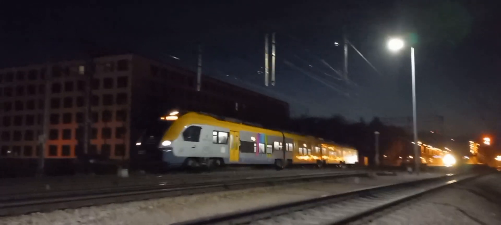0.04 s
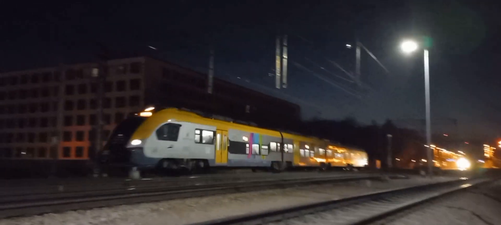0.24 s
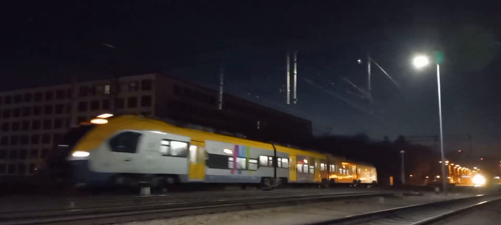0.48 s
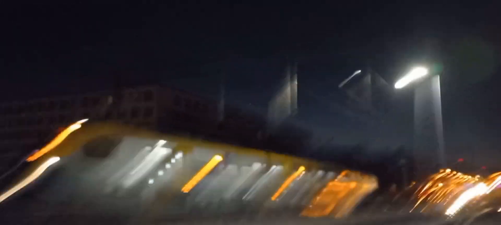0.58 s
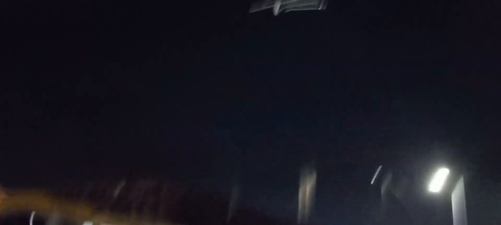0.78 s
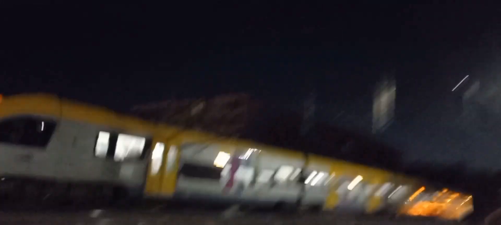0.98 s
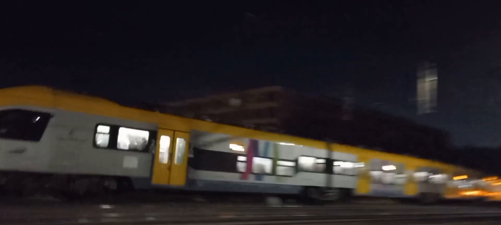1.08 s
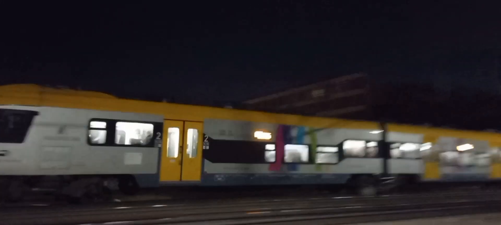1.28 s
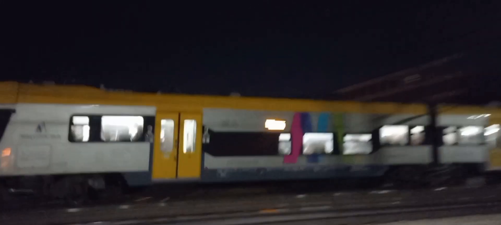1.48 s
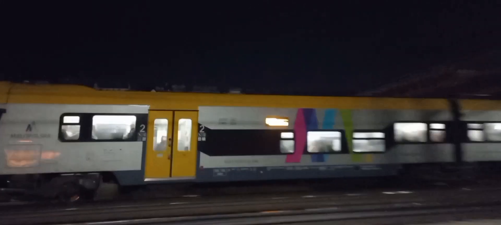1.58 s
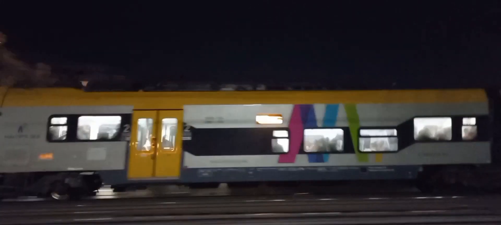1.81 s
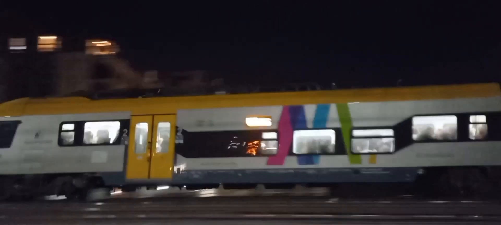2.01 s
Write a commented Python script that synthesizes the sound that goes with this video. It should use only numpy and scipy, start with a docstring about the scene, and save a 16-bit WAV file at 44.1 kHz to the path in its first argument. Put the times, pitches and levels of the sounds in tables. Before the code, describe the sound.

A train horn sounds one loud two-note blast after a rising air hiss, over low rumble and wheel roar; it cuts off, leaving echoes and quieter rolling. Outdoors by the tracks, stereo, close microphone slightly overloaded.

```python
"""Railway station: an electric train runs past and gives one blast on its two air horns.
Shaped noise makes the rumble, wheel roar, drive whine and the air hiss that rises before the blast.
Each horn is a harmonic stack: the low one stutters into voice and the high one joins;
the low one sputters out and the high one fades smoothly just after it.
Buildings ahead and behind return the chord sharp and flat, as noise tails on Doppler-shifted copies."""
import sys
import numpy as np
from scipy import signal
from scipy.io import wavfile
from scipy.ndimage import uniform_filter1d, minimum_filter1d, map_coordinates

SR = 44100
rng = np.random.default_rng(int(sys.argv[2]) if len(sys.argv) > 2 else 0)


def store_wav(level_fs):
    """Save 16-bit WAV to argv[1]."""
    pcm = np.round(np.clip(np.atleast_2d(level_fs), -1, 1) * 32767)
    wavfile.write(sys.argv[1], SR, pcm.T.astype(np.int16))


N = 90404

# Noise spectra are relative: each noise is scaled to unit rms before its level applies.
# low rumble level: time_s, level_db
RUMBLE_LEVEL = [(0, -28), (.19, -33), (.235, -20.5), (.275, -25.5), (.32, -33.5), (.39, -24.5),
                (.47, -25.5), (.53, -48), (.65, -49), (1.0, -51), (1.2, -48.5), (1.28, -42.5),
                (2.05, -41.5)]
# low rumble spectrum: freq_hz, density_db
RUMBLE_SPECTRUM = [(20, -57), (45, -41), (75, -12.5), (120, -22.5), (160, -11.5), (200, 3), (255, 0),
                   (320, -26), (500, -30), (1500, -57)]
# wheel roar level: time_s, level_db
ROAR_LEVEL = [(0, -34.5), (.2, -34.5), (.44, -33.5), (.56, -34.5), (.75, -44), (1.0, -41.5), (1.25, -42.5),
              (1.7, -43), (2.05, -42)]
# wheel roar spectrum: freq_hz, density_db
ROAR_SPECTRUM = [(30, -9), (200, -5), (430, 0.5), (600, -0.5), (930, -2), (1300, -7), (1650, -9),
                 (2100, -12), (3200, -12), (6200, -15.5), (7600, -36.5), (12000, -32), (16000, -35)]
# drive whine bands: centre_hz, width_hz, start_level_db
WHINE_BANDS = [(1940, 140, -46), (2345, 150, -44.5)]
# air hiss level: time_s, level_db
HISS_LEVEL = [(0, -52), (.19, -43), (.225, -31), (.42, -27.5), (.5, -28), (.58, -27), (.98, -31.5),
              (1.09, -36), (1.16, -35), (2.05, -82)]
# air hiss spectrum: freq_hz, density_db
HISS_SPECTRUM = [(200, -11), (950, -27), (1800, -3), (2500, -0.5), (2950, -6), (3400, -0.5), (4000, -3.5),
                 (5300, -1.5), (6600, -6.5), (7800, -23.5), (16000, -23)]
# top sizzle level: time_s, level_db
SIZZLE_LEVEL = [(0, -57), (.024, -75), (.034, -41), (.055, -52), (.11, -45), (.194, -51), (.202, -32),
                (.42, -31.5), (.51, -33), (.62, -32), (.96, -31.5), (1.09, -43.5), (1.2, -61), (1.5, -68),
                (1.53, -61), (1.6, -66), (1.8, -69), (1.925, -83), (1.938, -47), (2.05, -62.5)]
# top sizzle spectrum: freq_hz, density_db
SIZZLE_SPECTRUM = [(500, -35), (4000, -18), (6000, 2.5), (8200, -5.5), (10500, -2), (12500, 0),
                   (16000, -4.5)]
# left-right correlation of the noises: freq_hz, correlation (0-1)
NOISE_CORRELATION = [(40, .6), (90, 0.87), (170, 0.98), (260, 1), (600, 0.6), (2000, 0.53), (6000, 0.04),
                     (16000, .2)]
# low horn blow: time_s, pitch_hz, level_db, dullness_db_per_khz
LOW_BLOW = [(.45, 355.2, -30, 6), (.457, 363.4, -1.5, 4), (0.468, 373.4, 6, 1), (0.479, 373.3, 2.5, 6),
            (0.49, 364, -4.5, 14.5), (0.496, 364.7, 13.5, 3.5), (0.509, 388.8, 5, 1),
            (.54, 389.5, 0.5, 0.86), (0.719, 385.4, -0.5, 0.5), (0.991, 384.6, 2.5, 1),
            (1.035, 379, -5, -0.5), (1.052, 384, 8, 4.5), (1.069, 381.4, -14, -1.5), (1.088, 379.2, 5.5, 2),
            (1.125, 375.4, -20, -1.5)]
# high horn blow: time_s, pitch_hz, level_db, dullness_db_per_khz
HIGH_BLOW = [(.515, 686.4, -46, 6), (.535, 686.3, 2, 3), (.56, 698, 1.5, -0.27), (.63, 685.5, 0.5, -0.5),
             (.74, 680.5, -0.5, 0), (.94, 673.7, 1, 0.5), (1.02, 682, 1, 1.9), (1.055, 696.7, -3.5, 0.5),
             (1.1, 699.2, -2, 5.5), (1.145, 689, -7.5, 5), (1.175, 690, -25, -1)]
# low horn partials: multiple, left_db, right_db
LOW_PARTIALS = [(1, -21.5, -24.5), (2, -22, -22.5), (3, -22.5, -29), (4, -23, -28), (5, -30, -31.5),
                (6, -29.5, -29.5), (7, -34.5, -32.5), (8, -34.5, -34.5), (9, -34, -37), (10, -34, -46.5),
                (11, -36, -38), (12, -53, -32), (13, -51, -30), (14, -50, -32.5), (15, -42, -31),
                (16, -52, -46), (17, -52, -40), (18, -40.5, -45)]
# high horn partials: multiple, left_db, right_db
HIGH_PARTIALS = [(1, -16, -13.5), (2, -18.5, -21.5), (3, -23, -29.5), (4, -27.5, -28.5), (5, -38, -34.5),
                 (6, -30, -27.5), (7, -29.5, -39.5), (8, -33, -30), (9, -34, -36), (10, -39, -46),
                 (11, -46, -48), (12, -54, -61), (13, -57, -50), (14, -43, -48), (15, -45, -57),
                 (16, -42, -49), (17, -42.5, -47), (18, -52, -51), (19, -42, -50), (20, -52, -49),
                 (21, -44, -50), (22, -54, -60), (23, -50, -56)]
# lead of the left ear on the horns: freq_hz, lead_ms
EAR_LEAD = [(385, 0.34), (680, 0.29), (770, 0.32), (1350, 0.25), (1550, 0.307), (1950, .58), (2700, 0.535),
            (4070, 0.468), (4750, .42), (5450, 0.376), (16000, 0.393)]
# extra horn colour at the start: freq_hz, gain_db
EARLY_COLOUR = [(770, 1), (1150, -2), (1500, 2.5), (2000, 1.5), (2700, 5.5), (3100, 6.5), (3450, -3),
                (4300, -13.5), (5200, -6.5), (6500, 9), (8000, -4)]
# air spits as the low diaphragm catches: start_s, level_db (before the envelope)
SPITS = [(.456, -19), (.465, -17), (0.497, -7)]
# air spit spectrum: freq_hz, density_db
SPIT_SPECTRUM = [(100, -25), (300, -8), (800, 7), (1300, -11), (2700, -11), (3600, -13), (7000, -36),
                 (16000, -38)]
# echo groups: doppler_ratio, delay_s, level_db, t60_s
ECHOES = [(1.0, 0.0076, -17, 0.49), (1.019, 0.08, -17.5, 2.76), (.972, 0.094, -21, 4.16),
          (1.022, 0.22, -23.5, 0.099), (1.024, .62, -23, 0.11), (.972, .52, -26, 0.1),
          (.972, 0.99, -30.5, 0.32)]
# echo colour: freq_hz, gain_db
ECHO_COLOUR = [(380, -4), (700, 2.5), (1150, -1), (1550, 0.5), (2100, 8), (3000, -7.5), (3500, 5),
               (4100, -3), (6000, -5), (9000, -30), (16000, -9)]
# left-right correlation of the echo tails: freq_hz, correlation (0-1)
ECHO_CORRELATION = [(380, 0.79), (700, 0.56), (1400, 0), (3000, 0.51), (8000, 0)]

LOW_TRIM_DB, HIGH_TRIM_DB = -0.85, -0.6
# Diaphragm unsteadiness, fraction of pitch; its real part has 0.71 of this rms
JITTER, JITTER_HZ = 0.00297, 148
STUTTER, STUTTER_DECAY_S = 0.04, 0.027  # extra jitter as a diaphragm catches
# Partial flutter as the reflections shift, then fast turbulent rasp (fractions of amplitude)
SCATTER, SCATTER_PER_KHZ, SCATTER_HZ = 0.11, 0.12, 23.3
RASP_PER_KHZ, RASP_HZ = 0.1, 158
CLEAN_BELOW_KHZ = 0.54  # per-kHz flutter starts here
EARLY_UNTIL_S, EARLY_FADE_S = 0.655, 0.043
SPIT_RISE_S, SPIT_DECAY_S = 0.0013, 0.0042
ECHO_DULL_DB_PER_KHZ, AIR_LOSS_DB_PER_KHZ_S = 0.38, 0.5
ECHO_WANDER_MS, ECHO_WANDER_HZ = 0.25, 5  # paths shift as the train moves; real part, 0.71 rms
LOW_CUT_HZ, EDGE_HZ = 53, 15900
CEILING = 0.87  # limiter peak, full scale = 1


def amp(db):
    """Decibels to gain."""
    return 10 ** (np.asarray(db) / 20)


def evened(x):
    """Scales to unit rms."""
    return x / np.sqrt(np.mean(abs(x) ** 2) + 1e-20)


def read(points, hz):
    """Reads a spectrum on a log-frequency axis."""
    f, value = np.transpose(points)
    return np.interp(np.log(hz + 1), np.log(f), value)


def curves(points):
    """Interpolates each column of a timed table per sample."""
    s, *columns = np.transpose(points)
    return [np.interp(np.arange(N) / SR, s, column) for column in columns]


def flutter(hz):
    """Complex random wavering of unit rms, up to about hz."""
    f = np.fft.fftfreq(4096, 32 / SR)
    a, b = rng.standard_normal((2, len(f)))
    z = evened(np.fft.ifft((a + 1j * b) / (1 + (f / hz) ** 2) ** 2))
    return np.interp(np.arange(N) / 32, np.arange(len(f)), z)


def noise(spectrum, left_db, patchy_db, lead_ms):
    """Stereo noise of unit rms: left_db is left over right, lead_ms is left ahead, patches drift."""
    hz = np.fft.rfftfreq(2048, 1 / SR)
    a, b, c, d, patches = rng.standard_normal((5, N // 512 + 4, len(hz)))
    same = np.clip(read(NOISE_CORRELATION, hz), 0, 1)
    left = a + 1j * b
    right = same * left + np.sqrt(1 - same ** 2) * (c + 1j * d)
    right = right * np.exp(-2j * np.pi * hz * lead_ms / 1000)
    z = np.array([left * amp(left_db / 2), right * amp(-left_db / 2)])
    patches = uniform_filter1d(patches, size=3, axis=0)
    patches = evened(uniform_filter1d(patches, size=16, axis=1))
    z = z * amp(read(spectrum, hz) + patchy_db * patches)
    x = signal.istft(z, nperseg=2048, noverlap=1536, time_axis=1, freq_axis=2)[1]
    return evened(x[:, :N])


def rumble():
    """Low noise of the running train, nearly alike in both ears."""
    level = amp(curves(RUMBLE_LEVEL)[0])
    return level * noise(RUMBLE_SPECTRUM, left_db=1.5, patchy_db=0.0, lead_ms=0.024)


def wheel_roar():
    """Broad, patchy noise of wheels rolling on rails."""
    level = amp(curves(ROAR_LEVEL)[0])
    return level * noise(ROAR_SPECTRUM, left_db=1.2, patchy_db=2.5, lead_ms=0.44)


def drive_whine():
    """Drive whine: narrow noise bands, independent per ear, rising and falling with the roar."""
    t = np.arange(N) / SR
    whine = np.zeros((2, N))
    for hz, width_hz, level_db in WHINE_BANDS:
        carrier = np.exp(2j * np.pi * hz * t)
        band = np.array([(flutter(width_hz / 2) * carrier).real for _ in range(2)])
        whine += np.sqrt(2) * amp(level_db) * band
    roar_db = curves(ROAR_LEVEL)[0]
    return whine * amp(roar_db - roar_db[0])


def air_hiss():
    """Compressed air escapes as shaped turbulent noise until the valve shuts."""
    level = amp(curves(HISS_LEVEL)[0])
    return level * noise(HISS_SPECTRUM, left_db=-0.2, patchy_db=4.0, lead_ms=0.389)


def top_sizzle():
    """Treble noise close by on the left, made grainy by fast level wavering."""
    grain = evened(amp(2.1 * flutter(hz=400).real))
    level = grain * amp(curves(SIZZLE_LEVEL)[0])
    return level * noise(SIZZLE_SPECTRUM, left_db=10, patchy_db=2.5, lead_ms=0.11)


def horn(blow, partials, trim_db):
    """A diaphragm buzzes into a flare: harmonics whose pitch, level and dullness follow the blow."""
    hz, db, dull = curves(blow)
    t = np.arange(N) / SR
    start_s, end_s = blow[0][0], blow[-1][0]
    on = (t > start_s) & (t < end_s)
    unsteady = JITTER + STUTTER * np.exp(-abs(t - start_s) / STUTTER_DECAY_S)
    turns = np.cumsum(hz * (1 + unsteady * flutter(JITTER_HZ).real))[on] / SR
    early = np.clip((EARLY_UNTIL_S - t[on]) / EARLY_FADE_S, 0, 1)
    out = np.zeros((2, N))
    for k, (_, left_db, right_db) in enumerate(partials, 1):
        f = k * np.median(hz[on])
        khz = f / 1000
        dulling_db = dull[on] * khz * (k - 1) / k  # counted from the fundamental
        wave_db = trim_db + db[on] - dulling_db + early * read(EARLY_COLOUR, f)
        wave = np.sqrt(2) * amp(wave_db) * np.exp(2j * np.pi * k * turns)
        lag = np.exp(-2j * np.pi * khz * read(EAR_LEAD, f))  # kHz x ms = turns
        restless = max(khz - CLEAN_BELOW_KHZ, 0)
        for channel, gain in enumerate([amp(left_db), amp(right_db) * lag]):
            scatter = (SCATTER + SCATTER_PER_KHZ * restless) * flutter(SCATTER_HZ)[on]
            rasp = RASP_PER_KHZ * restless * flutter(RASP_HZ)[on]
            out[channel, on] += (gain * wave * evened(1 + scatter + rasp)).imag
    return out


def spits():
    """Each catch of the low diaphragm lets out a short rough puff."""
    level = np.zeros(N)
    for start_s, level_db in SPITS:
        age = np.maximum(np.arange(N) / SR - start_s, 0)
        level += amp(level_db) * np.minimum(age / SPIT_RISE_S, 1) * np.exp(-age / SPIT_DECAY_S)
    return level * noise(SPIT_SPECTRUM, left_db=-4.0, patchy_db=2.5, lead_ms=0.35)


def echo(sound, ratio, delay_s, level_db, t60_s):
    """Buildings return the horns Doppler-shifted, in a decaying noise tail that loses treble."""
    at = np.arange(N)
    middle = np.mean([LOW_BLOW[0][0], LOW_BLOW[-1][0]]) * SR  # pivot of the time stretch
    wander = ECHO_WANDER_MS * flutter(ECHO_WANDER_HZ).real * SR / 1000
    shifted = map_coordinates(sound, [middle + (at - middle) * ratio + wander], order=3)

    hz, t, z = signal.stft(rng.standard_normal((2, N)), SR, nperseg=256)
    same = np.clip(read(ECHO_CORRELATION, hz), 0, 1)[:, None]
    khz = hz[:, None] / 1000
    z = np.array([z[0], same * z[0] + np.sqrt(1 - same ** 2) * z[1]])
    loss_db = khz * (ECHO_DULL_DB_PER_KHZ + AIR_LOSS_DB_PER_KHZ_S * t)
    z = z * amp(read(ECHO_COLOUR, hz)[:, None] - loss_db)
    age_s = at / SR - delay_s
    fade = amp(-60 * np.maximum(age_s, 0) / t60_s) * (age_s > 0)
    tail = signal.istft(z, SR, nperseg=256)[1][:, :N] * fade / np.linalg.norm(fade)
    return amp(level_db) * signal.fftconvolve(shifted[None], tail, axes=1)[:, :N]


def scene():
    """Running train and air, then both horns with spits and echoes."""
    train = rumble() + wheel_roar() + drive_whine()
    air = air_hiss() + top_sizzle()
    low = horn(LOW_BLOW, LOW_PARTIALS, LOW_TRIM_DB)
    high = horn(HIGH_BLOW, HIGH_PARTIALS, HIGH_TRIM_DB)
    chord = low + high
    echoes = sum(echo(chord[0], *row) for row in ECHOES)  # fed by the left channel
    return train + air + chord + spits() + echoes


def record(dry):
    """Bass cut, fast peak limiter linked across channels, then band limit."""
    bass_cut = signal.butter(4, LOW_CUT_HZ, "high", fs=SR, output="sos")
    x = signal.sosfilt(bass_cut, dry)
    room = np.minimum(CEILING / (abs(x).max(0) + 1e-9), 1)
    x = x * uniform_filter1d(minimum_filter1d(room, size=200), size=200)
    band_limit = signal.firwin(511, EDGE_HZ, window=("kaiser", 9), fs=SR)
    return signal.oaconvolve(x, band_limit[None], "same")


dry = scene()
out = record(dry)
store_wav(out)
```